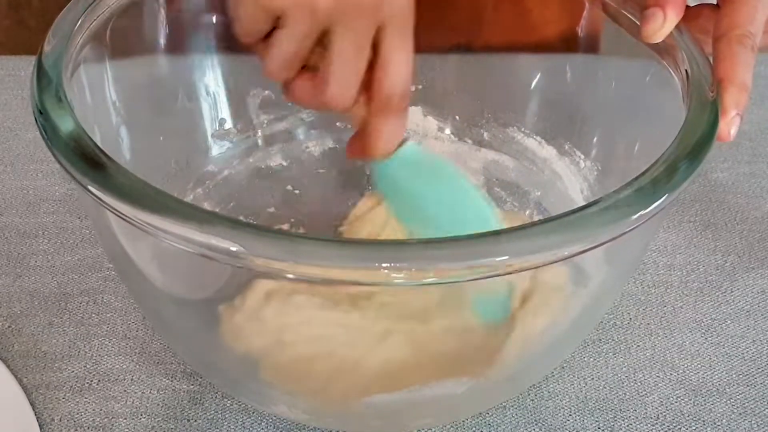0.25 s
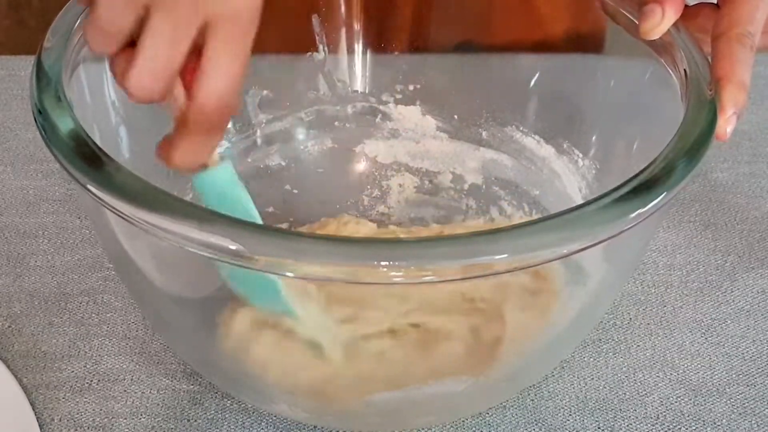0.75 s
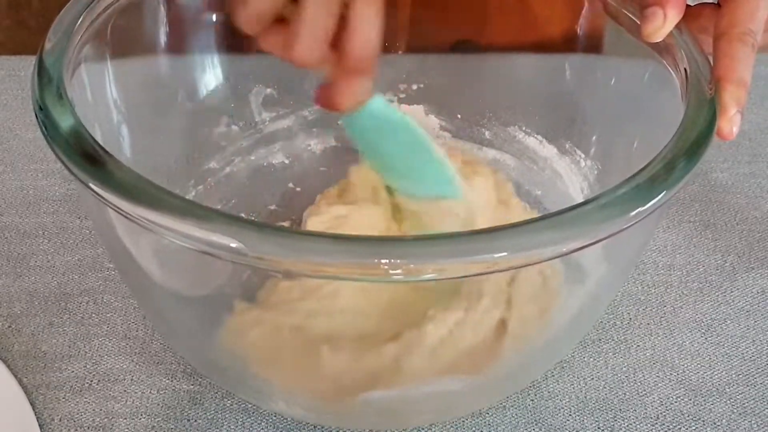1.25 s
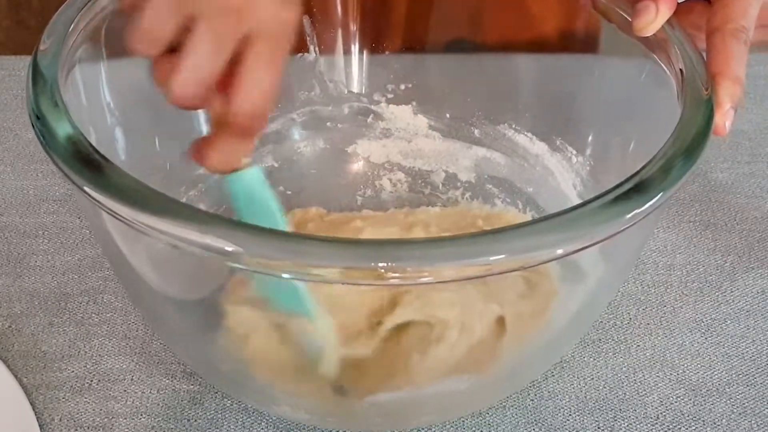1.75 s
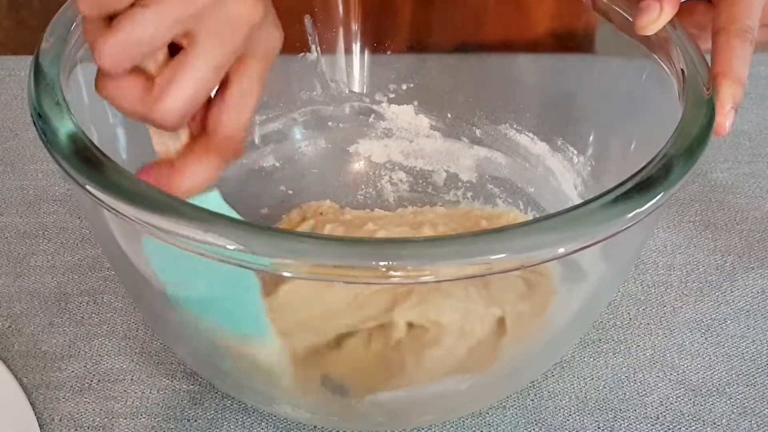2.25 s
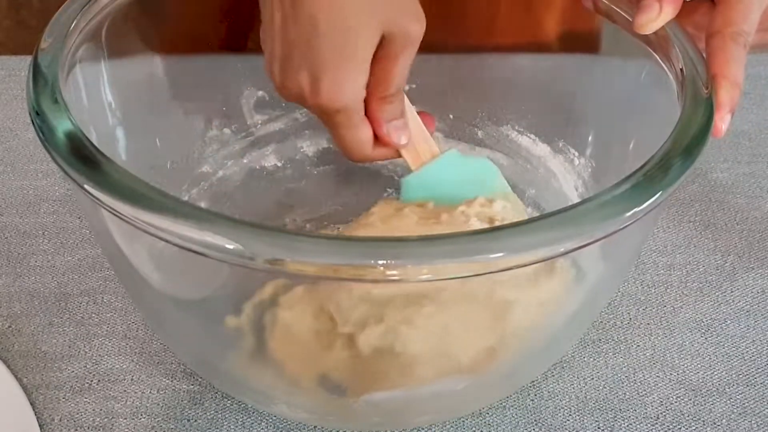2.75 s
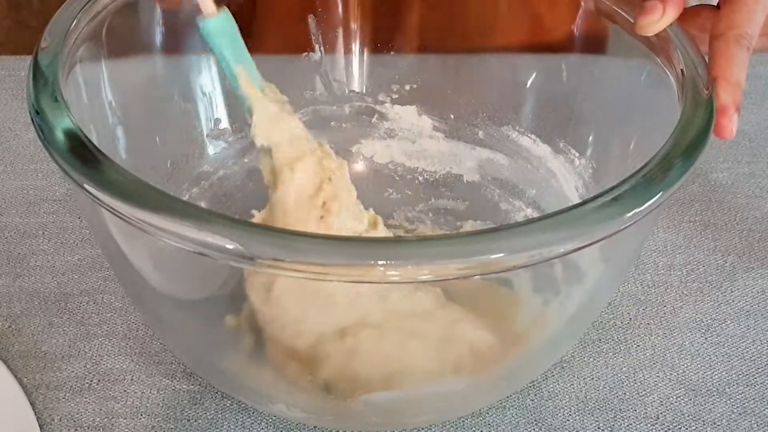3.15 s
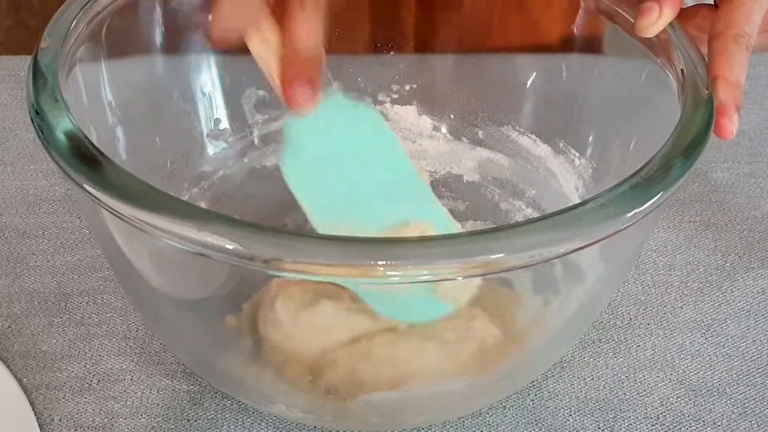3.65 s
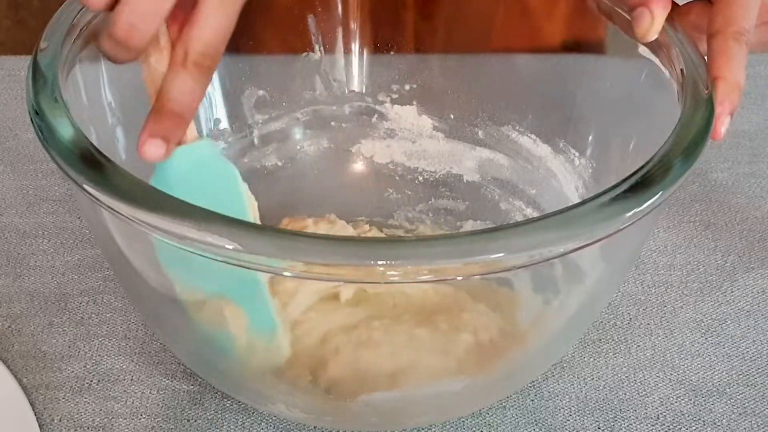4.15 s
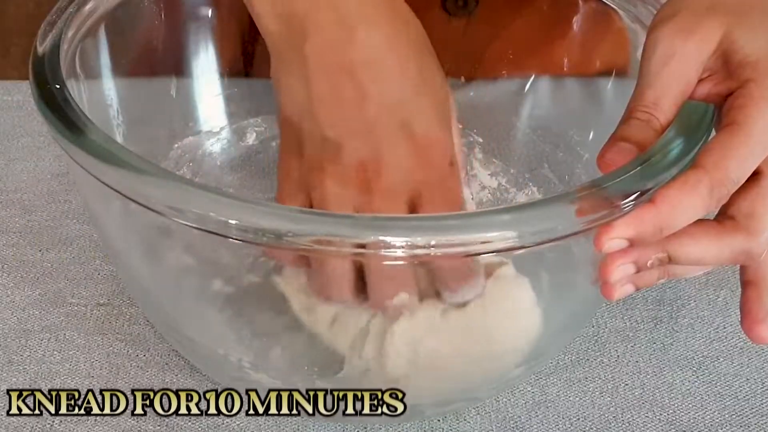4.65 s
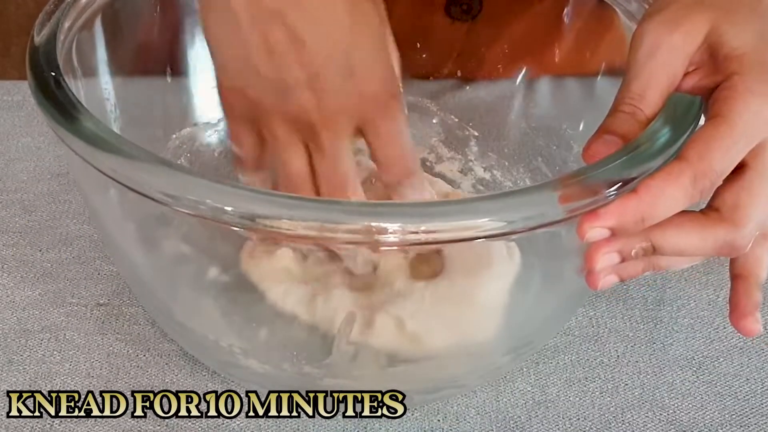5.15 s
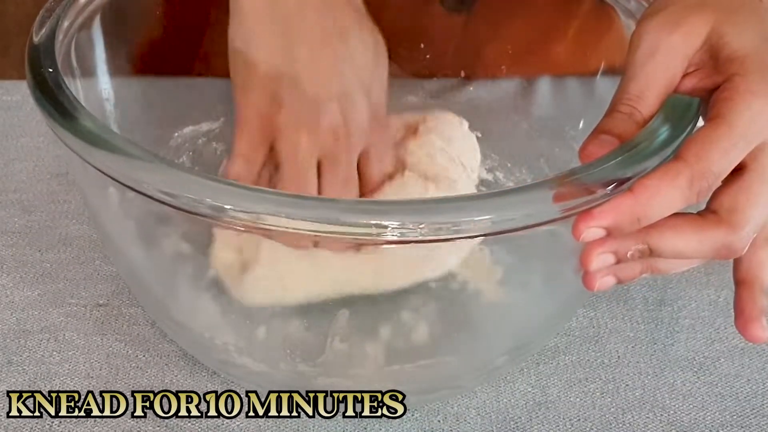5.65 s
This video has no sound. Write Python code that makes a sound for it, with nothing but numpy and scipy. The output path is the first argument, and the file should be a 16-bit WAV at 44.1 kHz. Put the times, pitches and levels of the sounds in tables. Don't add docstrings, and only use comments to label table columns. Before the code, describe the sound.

Sticky dough is folded in a glass bowl with deep table thumps and wet scrapes, then dragged briefly and softly kneaded by hand.

```python
import sys
import numpy as np
from scipy import signal
from scipy.io import wavfile
from scipy.ndimage import uniform_filter1d

SR = 44100
rng = np.random.default_rng(int(sys.argv[2]) if len(sys.argv) > 2 else 0)


def unload_audio(sound):
    columns = np.transpose(np.atleast_2d(sound))
    steps = np.round(np.clip(columns, -1, 1) * 32767)
    wavfile.write(sys.argv[1], SR, steps.astype(np.int16))


def volts_from_db(level):
    exponent = np.asarray(level, float) / 20
    return 10 ** exponent


N = 260190
CHANGE_S = 4.2154
TOP_HZ = 15900

# frequency in Hz, density in dB per Hz.
ROOM_SPECTRUM = [(21, -46), (36, -15.5), (86, 2), (139, -12.5), (299, -13.5), (406, -17), (511, -18.5),
                 (1830, -27), (1980, -30.5), (2620, -27), (3500, -30.5), (5000, -30), (6500, -33),
                 (8240, -33), (16000, -31)]
# frequency in Hz, likeness from 0 to 1.
STEREO_LIKENESS = [(50, 0.51), (130, 0.24), (300, 0.45), (700, 0.18), (2000, 0.052), (8000, 0.021)]

# start in seconds, level in dB, seconds until a hand damps it.
GLASS_TAPS = [
    (2.813, -37, 0.085),
    (2.918, -45, 0.0055),
]
# frequency in Hz, level in dB, 60 dB decay in seconds.
GLASS_MODES = [(402.4, -3.5, 0.45), (530, -9, 0.05), (439, -9, 0.28), (237, -12, 0.076), (1104, -11, 1),
               (1118, -21, 0.4), (702, -18.5, .05), (940, -13, 0.066), (2050, -18.5, 0.13),
               (1575, -21, .06), (2560, -13, 0.027)]
# peak in seconds, frequency in Hz, level in dB,
# rise in seconds, fall in seconds.
GLASS_SINGING = [(0.019, 924, -51, 0.041, 0.058), (1.568, 1554, -62, 0.045, .1),
                 (2.38, 4200, -49, .006, 0.074), (2.36, 5730, -49, .006, 0.087),
                 (2.36, 940, -53, 0.026, 0.082), (2.37, 1570, -63, 0.045, 0.09),
                 (2.41, 7200, -49, .08, .08), (2.401, 8000, -49, 0.093, 0.092), (2.422, 4000, -61, .06, .1),
                 (2.519, 4340, -56, .05, 0.14), (2.539, 2400, -56.5, .08, 0.14),
                 (2.54, 6300, -63, .04, 0.039), (2.74, 4000, -57, .05, 0.045),
                 (2.712, 5870, -50, 0.049, 0.081), (2.705, 3800, -52, 0.04, 0.08),
                 (2.75, 2500, -54, 0.07, 0.13), (2.76, 4600, -59, 0.067, .1),
                 (2.83, 3190, -55.5, 0.032, 0.04), (2.918, 4400, -58, 0.031, 0.069),
                 (4.275, 8200, -46.5, 0.053, .06), (4.27, 5000, -52, 0.045, .1),
                 (4.29, 6770, -50, 0.064, .06), (4.321, 7000, -50, .04, .03),
                 (4.295, 2950, -48, 0.048, 0.069), (4.33, 2980, -47, 0.035, 0.05),
                 (4.32, 5400, -54, 0.092, 0.07), (4.33, 4680, -52.5, .04, .06),
                 (4.33, 970, -54, .05, 0.085), (4.39, 490, -53.5, .05, 0.043), (4.42, 1000, -58, .04, .04),
                 (4.3, 1570, -55.5, 0.057, 0.09), (4.361, 1570, -61, 0.054, .08),
                 (4.352, 2820, -48.5, 0.037, 0.06), (4.839, 1570, -59, 0.086, .1),
                 (4.9, 1000, -67, 0.092, 0.074)]

# start in seconds, crack in dB, centre in Hz, fizz in dB re crack.
DOUGH_SNAPS = [(.1330, -29, 12000, -3), (.5975, -46, 8000, -8), (.6282, -34, 8000, -11),
               (.6475, -40, 9500, -6), (.9482, -43, 12000, -9), (.9635, -44, 12000, -4),
               (.9715, -38, 13000, -7), (1.2160, -46, 8000, -9), (1.2410, -42, 6600, -8),
               (1.5350, -39, 7500, -8), (1.7738, -42, 11500, -10), (1.9130, -38, 12500, -11),
               (2.2590, -39, 13500, -12), (2.2905, -33, 11000, -8), (2.2940, -36, 10500, -11),
               (2.2985, -34, 11000, -10), (2.3553, -23, 7000, -10), (2.3560, -27, 13000, -12),
               (2.4876, -25, 10000, -10), (2.5115, -33, 5500, -12), (2.5375, -35, 6000, -12),
               (2.7295, -33, 6000, -14), (2.6650, -38, 5000, -8), (2.7085, -34, 6000, -12),
               (2.7495, -34, 5000, -12), (2.8035, -31, 12000, -8), (2.9015, -33, 12000, -10),
               (4.6008, -44, 9000, -9)]
# start in seconds, plop in dB, centre in Hz, fizz in dB re plop.
WET_PLOPS = [(.133, -48, 950, 2), (.594, -55, 990, 5), (.628, -56, 980, 0), (.895, -52, 980, -5),
             (1.535, -36, 500, -1), (1.536, -48, 1710, -1), (1.588, -41, 1090, 0), (2.29, -50, 1570, 1),
             (2.355, -45.5, 940, 6.5), (2.487, -39, 1040, -6), (2.507, -47, 1030, 0),
             (2.507, -52, 1570, -4), (2.385, -50, 960, 2), (2.813, -39, 800, -6), (.952, -51, 1250, 2),
             (1.589, -46, 1800, -2), (1.605, -50, 1000, -3), (1.86, -52, 1310, 1), (1.775, -54, 1200, -3),
             (3.734, -51, 950, 5.5), (4.592, -57, 664, -13)]
# start in seconds, knock in dB, centre in Hz,
# rattle in dB re knock.
FOOT_KNOCKS = [(.27, -54, 300, -3), (.30, -57, 430, -14), (.32, -48, 430, 0), (.43, -57, 450, -3),
               (.593, -45, 440, -4), (.627, -44, 400, -8), (.655, -52, 400, -2), (.895, -55, 297, -3),
               (.918, -52, 330, -4), (1.213, -44, 435, -12), (1.225, -49, 247, -6), (1.262, -46, 360, -5),
               (1.30, -52, 300, -2), (1.533, -44, 464, -3), (1.555, -48, 240, -4), (1.56, -52, 508, -4),
               (1.59, -50, 420, -2), (1.838, -48, 600, -6), (1.845, -43, 244, 0), (1.865, -44, 290, -1),
               (1.89, -47, 380, -2), (1.93, -49, 330, -2), (2.487, -51, 450, -4), (2.592, -51, 400, -3),
               (2.655, -52, 300, -2), (2.746, -50, 380, -3), (2.815, -45, 146, -9), (2.828, -45, 450, -2),
               (2.918, -48, 400, -10), (4.192, -42, 187, -3), (4.228, -42, 243, 0), (4.240, -37, 227, -4),
               (4.31, -47, 480, -2), (4.355, -47, 500, -2), (4.594, -50.5, 350, 0), (5.02, -58, 500, -2),
               (5.2, -54, 300, -6), (5.23, -54, 320, -6)]
# start in seconds, thud in dB, centre in Hz,
# rumble in dB re thud.
BOWL_WOBBLES = [(.29, -46, 90, -3), (.6, -55, 96, -5), (.9, -46, 95.5, 2), (1.225, -40.5, 89.5, 5),
                (1.545, -32.5, 95, -9), (1.55, -44, 212, -1), (1.6, -39, 93, -1), (1.812, -44, 91, 3),
                (1.85, -35.5, 95.5, 9), (1.848, -41, 252, 1.5), (1.9, -40, 134, -1), (4.22, -46, 199, 0),
                (2.26, -52, 58, -2), (5.1, -53.5, 65, 6.5), (5.3, -50, 66.6, 1.5)]

# peak in seconds, hiss in dB, rise in seconds,
# fall in seconds, digging in dB; rise and fall span 20 dB.
STIRRING_STROKES = [(0.0, -50, .011, 0.37, -11), (.134, -48.5, 0.006, 0.13, 6.5),
                    (.323, -57, 0.056, 0.5, -6), (.635, -49.5, 0.034, 0.051, -11),
                    (.65, -47.5, 0.012, 0.17, -11.5), (.913, -60.5, 0.13, 2.6, -10),
                    (.966, -49.5, 0.026, 0.2, -13), (1.286, -50, 0.09, 0.13, -1.5), (1.3, -79, 3.1, 4.1, 4),
                    (1.536, -49, 0.0035, 0.13, -19), (1.57, -49, 0.073, 0.21, -5),
                    (1.75, -62.5, 0.15, 0.69, -2), (1.912, -53, 0.085, 0.19, -10)]
SCRAPING_STROKES = [(2.278, -64, 0.17, 0.035, -51), (2.289, -47.5, .003, 1, -17),
                    (2.356, -46, 0.047, 0.28, 6), (2.41, -45.5, 0.15, 0.33, 11.5),
                    (2.5, -49.5, .02, 0.7, 14), (2.715, -42.5, 0.082, 0.19, 4.5),
                    (2.762, -46.5, 0.12, 0.043, -4), (2.84, -49, 0.045, 0.19, -8.5),
                    (2.903, -41, 0.003, 0.055, -8), (3.066, -51, 0.092, 0.18, -3),
                    (3.493, -66, 0.51, 0.16, -20), (3.649, -65, .2, 0.082, -17),
                    (3.779, -57.5, 0.094, 0.19, -14)]
KNEADING_STROKES = [
    (4.546, -57.5, 0.12, 0.085, -4),
    (4.61, -51.5, 0.045, 0.087, 0.5),
    (4.736, -61, 0.34, .2, -4),
    (4.812, -44.5, 0.086, 0.1, 0.5),
    (4.89, -45.5, 0.13, 0.18, 3.5),
    (5.03, -53.5, .15, 0.074, 5),
    (5.19, -55.5, 0.99, 0.14, -1.5),
    (5.63, -57, 0.48, 0.1, -2.5),
    (5.718, -51.5, 0.066, 0.25, -1),
    (5.899, -58, 0.25, 0.14, 0),
]
# time in seconds, hiss in dB, digging in dB.
DRAG_MOTION = [
    (4.215, -49.5, -6),
    (4.235, -47.5, -4),
    (4.271, -47, -0.5),
    (4.327, -42.5, 5.5),
    (4.388, -48, 7.5),
    (4.465, -58.5, -3),
    (4.5, -74, -3),
]
# peak in seconds, wall in dB, rise in seconds,
# fall in seconds, cavity in dB re wall.
BLADE_SMEARS = [(.014, -70.5, 0.029, 0.12, 11.5), (.14, -75.5, 0.0087, 0.18, 10.5),
                (0.622, -68, 0.046, 0.12, 0), (.95, -68, 0.056, 0.3, 0.5), (1.272, -63, 0.061, 0.12, 0),
                (1.536, -54.5, 0.006, 0.11, 1.5), (1.59, -56, .03, 0.11, -1.5), (1.74, -65, .05, 0.11, -14),
                (2.36, -53, 0.066, 0.17, -3.5), (2.5, -56, 0.022, 0.22, -3), (2.6, -61, 0.11, 0.13, -6),
                (2.679, -63, 0.054, 0.17, -6), (2.76, -59, 0.12, 0.12, -12), (3.74, -74, 0.015, 0.063, 11)]
HAND_SMEARS = [
    (4.83, -61.5, 0.064, 0.25, 2.8),
    (5.15, -74.5, 1, 0.32, 4.5),
    (5.72, -72.5, 0.056, 0.25, 7.6),
]

# centre in Hz, width in Hz, level in dB.
FULL_BOWL = [
    [(7800, 2900, 1), (11460, 1200, 2.5), (15200, 3700, 1)],
    [(3800, 1750, 5), (5900, 1500, 5.5)],
    [(2090, 1000, 16), (2920, 800, 7), (3300, 770, 4)],
    [(989, 75, 5), (1566, 160, 1)],
]
# centre in Hz, width in Hz, level in dB.
DRAGGED_BOWL = [
    [(7400, 1900, 1.3), (11400, 5000, 1), (15300, 3500, 0)],
    [(3550, 1700, 3.4), (5240, 3700, 2.2)],
    [(2950, 360, 3.5), (2730, 1500, -2.5)],
    [(476, 51, 5.5), (1020, 58, 1.5), (1570, 540, -4.5)],
]
# centre in Hz, width in Hz, level in dB.
KNEADED_BOWL = [
    [(7630, 1800, 0.86), (12050, 2500, -0.34), (15500, 1400, -1.7)],
    [(3930, 2100, 0), (6440, 3700, 0)],
    [(2260, 2400, 11), (3330, 740, 2)],
    [(596, 250, -1.3), (1000, 150, 2), (1560, 340, -1)],
]
# low edge in Hz, high edge in Hz.
PART_RANGES = [(6270, 15540), (2600, 9400), (1410, 3800), (280, 2000)]
# level in dB, dB per dB of digging,
# dB per dB of hiss.
FULL_BALANCE = [
    (-5, 0.84, -0.18),
    (-17, 0.36, -0.72),
    (-21.5, 0.1, -0.5),
]
# level in dB, dB per dB of digging, dB per dB of hiss.
DRAGGED_BALANCE = [
    (-6, 0.5, 0.24),
    (-14.5, 1.25, 0.04),
    (-8, 0.91, 0.035),
]
# level in dB, dB per dB of digging, dB per dB of hiss.
KNEADED_BALANCE = [
    (-6.5, 1.23, -0.17),
    (-17, 0.44, -0.45),
    (-16, 0.33, -0.45),
]

# peak in seconds, creak in dB, rise in seconds, fall in seconds,
# rumble in dB re creak.
TABLE_PUSHES = [(0.0, -47, .01, 0.31, -3), (.3, -48, 0.067, 0.25, 1), (.64, -46.5, 0.092, 0.15, 1),
                (.95, -53.5, 0.13, 0.58, -0.5), (1.23, -42, 0.025, 0.19, 6), (1.54, -40, 0.015, 0.17, 8),
                (1.87, -41.5, 0.029, 0.13, 2), (2.4, -52.5, 0.21, 1, 0.5), (2.82, -42.5, 0.05, 0.21, -5.5),
                (3.73, -45, 0.0086, 0.13, -10), (4.23, -47.5, 0.044, 0.43, -3.5),
                (4.85, -56, 0.086, 0.78, 2.5), (5.1, -53.5, .2, 0.48, -10), (5.46, -64, 0.45, 0.72, 4)]
RESTING_HANDS = [
    (0.0, -60.5, 50., 50.6, 4),
]
# start in seconds, level in dB,
# panel in dB re level.
DOUGH_DROPS = [(.2848, -15.5, -5.6), (.5967, -22.6, -11), (.614, -40, 12.5), (.8976, -25.9, 4),
               (1.2181, -11.3, -.7), (1.5366, -8, 2.1), (1.8257, -19.4, -40), (1.8435, -28.4, -40),
               (1.8728, -21.5, -40), (2.917, -40, 10), (4.1947, -19.1, 5), (4.8505, -50, 16)]
# start in seconds, level in dB, panel in dB re level.
SIDE_SHOVES = [(1.8435, -8.4, 3.7), (1.8728, -19, -40), (2.3377, -28.6, -1.4), (2.8049, -22.4, -4.3),
               (4.2273, -21.2, -40), (4.8045, -26.2, -20), (5.4325, -23.5, -12)]
# start in seconds, level in dB.
HEEL_BUMPS = [(.2618, -13.2), (.2848, -10.8), (.5689, -13.9), (.5967, -7.9), (.614, -20.9), (.8692, -18.9),
              (.8976, -7.6), (1.187, -24), (1.2181, -14.2), (1.497, -21), (1.5366, -9.4), (1.809, -13),
              (1.8257, -17), (1.8435, 3.7), (2.4905, -17.9), (4.2273, -9), (4.5914, -18.7), (4.7189, -21.8),
              (4.8505, -21.2), (5.4325, -22.9)]
# frequency in Hz, 60 dB decay in seconds, polarity.
TABLE_MODES = [(45.7, .452, 1), (52.75, .134, -1), (118, .0258, -1), (132.74, .374, -1)]
TABLE_MODE_PANS = [-9.5, -5, -2.5, -8]
# frequency in Hz, level in dB, 60 dB decay in seconds.
UPPER_TABLE_MODES = [(80.6, 12, 0.53), (102, -2, 0.4), (163, -16, 0.084), (226, 7.5, 0.45), (301, 7, 0.49),
                     (360, -25, 0.21), (417, -14, 0.071), (510, 12, 0.099)]


def rms_one(x):
    return x / np.sqrt(np.mean(x ** 2) + 1e-20)


def in_time(rows):
    s, *columns = np.transpose(rows)
    return [np.interp(np.arange(N) / SR, s, c) for c in columns]


def at_hz(points, hz):
    table_hz, values = np.transpose(points)
    return np.interp(np.log(hz), np.log(table_hz), values)


def band(x, low_hz, high_hz):
    edges = [low_hz, min(high_hz, .45 * SR)]
    return signal.sosfilt(signal.butter(2, edges, "band", fs=SR, output="sos"), x)


def drift(rate_hz):
    r = np.exp(-80 * np.pi * rate_hz / SR)
    chance = rng.standard_normal(N // 40 + 2002)
    slow = signal.lfilter([1], [1, -2 * r, r * r], chance)[2000:]
    return np.interp(np.arange(N) / 40, np.arange(len(slow)), rms_one(slow))


def grain(shape, grain_db):
    return volts_from_db(grain_db * np.minimum(rng.exponential(1, shape), 4))


def ring(clicks, hz, t60):
    r = volts_from_db(-60 / (t60 * SR))
    w = 2 * np.pi * hz / SR
    return signal.lfilter([0, np.sin(w)], [1, -2 * r * np.cos(w), r * r], clicks + 1e-18)


def resonances(x, peaks, patchy_db=0):
    out = 0
    for k, (hz, width, db) in enumerate(peaks):
        r = np.exp(-np.pi * width / SR)
        a = [1, -2 * r * np.cos(2 * np.pi * hz / SR), r * r]
        gain = volts_from_db(db + patchy_db * drift(20.0))
        out = out + (-1) ** k * gain * signal.lfilter([1 - r * r, 0, r * r - 1], a, x)
    return rms_one(out)


def spread_out(mid, side, share=1):
    return mid + share * side * [[1], [-1]]


def alike_pair(mid, side, alike):
    return spread_out(np.sqrt(1 + alike) * mid, np.sqrt(1 - alike) * side)


def likeness(low_hz, high_hz):
    return np.clip(at_hz(STEREO_LIKENESS, np.sqrt(low_hz * high_hz)), -1, 1)


def panned(x, pan_db):
    pair = volts_from_db([[pan_db / 2], [-pan_db / 2]])
    return x * pair / pair.mean()


def coloured(spectrum, patchy_db, grain_db):
    white = rng.standard_normal((2, 2, N)) * grain(N, grain_db)
    first, last = spectrum[0][0], spectrum[-1][0]
    edges = np.geomspace(first, last, 1 + round(2 * np.log2(last / first)))
    out = 0
    for k, (low, high) in enumerate(zip(edges, edges[1:])):
        mid, side = band(white[k % 2], low, high)
        gain = volts_from_db(at_hz(spectrum, np.sqrt(low * high)) + patchy_db * drift(23.0))
        out = out + gain * alike_pair(mid, side, likeness(low, high))
    return out / np.sqrt(np.mean(out.mean(axis=0) ** 2))


def strokes(rows):
    s, db, rise, fall, manner_db = np.transpose(rows)[:, :, None]
    t = np.arange(0, N + 32, 32) / SR
    away = np.maximum((s - t) / np.maximum(rise, .001), (t - s) / np.maximum(fall, .01))
    power = volts_from_db(2 * db - 40 * away) + 1e-30
    total = power.sum(axis=0)
    manner = (power * manner_db).sum(axis=0) / total
    return in_time(np.transpose([t, 10 * np.log10(total), manner]))


def kitchen_air():
    return volts_from_db(-56.5) * coloured(ROOM_SPECTRUM, patchy_db=0.37, grain_db=-1.2)


def scene_change():
    t = np.arange(N) / SR - CHANGE_S
    return volts_from_db(-23.5) * (t >= 0) * np.exp(-np.maximum(t, 0) / .0013)


def glass():
    out, t = np.zeros(N), np.arange(SR // 3) / SR
    for s, db, free_s in GLASS_TAPS:
        click = volts_from_db(db) * (np.arange(len(t)) < 8) / 8
        damping = volts_from_db(-900 * np.maximum(t - free_s, 0))
        tone = 0
        for k, (hz, mode_db, t60) in enumerate(GLASS_MODES):
            tone = tone + (-1) ** k * volts_from_db(mode_db) * ring(click, hz, t60)
        out[round(s * SR):][:len(t)] += damping * tone
    return out


def singing():
    width_hz, side_share = 53, 0.61
    out, t = np.zeros((2, N + SR)), np.arange(-SR // 4, SR // 4) / SR
    noises = rng.standard_normal((len(GLASS_SINGING), 2, len(t)))
    for (s, hz, db, rise, fall), noise in zip(GLASS_SINGING, noises):
        mid, side = signal.lfilter(*signal.iirpeak(hz, hz / width_hz, fs=SR), noise)
        away = np.maximum(-t / max(rise, .002), t / max(fall, .01))
        swell = volts_from_db(db - 20 * away) / mid.std()
        at = round(s * SR) + SR // 4
        out[:, at:at + len(t)] += swell * spread_out(mid, side, side_share)
    return out[:, SR // 2:][:, :N]


def snaps(rows, crack_s, spread, t60, pan_db):
    out, t = np.zeros((2, N)), np.arange(SR // 4) / SR
    for (s, db, hz, fizz_db), noise in zip(rows, rng.standard_normal((len(rows), 2, len(t)))):
        edges = hz / spread, min(hz * spread, TOP_HZ)
        crack = band(band(noise[0] * np.exp(-t / crack_s), *edges), *edges)
        fizz = band(noise + 0.29 * noise[::-1], hz / 1.12, hz * 1.126)
        fizz = rms_one(fizz) * volts_from_db(-60 * t / max(t60, .003) + fizz_db)
        at = round(s * SR)
        out[:, at:at + len(t)] += panned(volts_from_db(db) * (crack / np.abs(crack).max() + fizz), pan_db)
    return out


def friction(motion, smears, span, parts, bowl, grain_db, patchy_db, pan_db):
    hiss_db, dig_db = motion
    louder_db = np.maximum(hiss_db, -80) + 50
    part_dbs = [0] + [db + by_dig * dig_db + by_hiss * louder_db for db, by_dig, by_hiss in parts]
    wall_db, cavity_db = strokes(smears)
    smeared = [0, 0, volts_from_db(wall_db), volts_from_db(wall_db + cavity_db)]
    t = np.arange(N) / SR
    touching = (t >= span[0]) & (t < span[1])
    out, catch = 0, grain(N, grain_db)
    for part_db, extra, peaks, (low, high) in zip(part_dbs, smeared, bowl, PART_RANGES):
        grains = band(catch * rng.standard_normal((2, N)), low, high)
        mid, side = resonances(grains, peaks, patchy_db)
        alike = likeness(low, high)
        pair = alike_pair(mid, side, alike) / np.sqrt(1 + alike)
        level = np.hypot(volts_from_db(hiss_db + part_db), extra)
        out = out + level * volts_from_db(0.3 * patchy_db * drift(56)) * pair
    return touching * panned(out, pan_db)


def pressure():
    creak_db, rumble_db = strokes(TABLE_PUSHES + RESTING_HANDS)
    modes = [(47.5, 11.7, -2.5), (84.7, 31.2, -4.5), (131.0, 37.6, -7.0)]   # Hz, width Hz, dB
    mid, side = resonances(rng.standard_normal((2, N)), modes)
    shake_level = volts_from_db(np.minimum(creak_db + rumble_db, -49))
    shake = spread_out(mid, side, 0.74) * panned(shake_level, -10.5)
    creak = coloured([(170, -7.0), (350, -1.0), (680, -18.5)], patchy_db=-0.5, grain_db=3.0)
    return shake + panned(volts_from_db(creak_db - 6.0) * creak, -4)


def contacts():
    none = -99
    drops = [(s, db, db - 16, none, db + panel_db) for s, db, panel_db in DOUGH_DROPS]
    shoves = [(s, db - 12, db, none, db + panel_db) for s, db, panel_db in SIDE_SHOVES]
    bumps = [(s, db - 25, none, db, none) for s, db in HEEL_BUMPS]
    return np.array(drops + shoves + bumps)


def thumps():
    rows = contacts()
    at, out = np.round(rows[:, 0] * SR).astype(int), 0
    for k, (hz, t60, polarity) in enumerate(TABLE_MODES):
        clicks = np.bincount(at, polarity * volts_from_db(rows[:, 1 + k]), N)
        out = out + panned(ring(clicks, hz, t60), TABLE_MODE_PANS[k])
    soft = np.exp(-1 / (.01 * SR))
    out = uniform_filter1d(signal.lfilter([1 - soft], [1, -soft], out), size=111) * 1.13
    chance = rng.standard_normal((len(rows), len(UPPER_TABLE_MODES)))
    for (hz, db, t60), luck in zip(UPPER_TABLE_MODES, chance.T):
        clicks = np.bincount(at, volts_from_db(rows[:, 4] - 49.5 + db + 0.87 * luck), N)
        out += panned(ring(uniform_filter1d(clicks, size=51), hz, t60), -5.0)
    return out


def scene():
    air = panned(kitchen_air(), -2.1)
    ringing = panned(glass(), -6.0) + panned(singing(), -2.7)
    sticking = snaps(DOUGH_SNAPS, crack_s=.0003, spread=3.0, t60=.014, pan_db=1)
    sticking += snaps(WET_PLOPS, crack_s=0.00024, spread=4.2, t60=0.027, pan_db=1)
    sticking += snaps(FOOT_KNOCKS, crack_s=0.0067, spread=1.25, t60=0.052, pan_db=-2.5)
    rubbing = friction(strokes(STIRRING_STROKES + SCRAPING_STROKES), BLADE_SMEARS, (0, CHANGE_S),
                       FULL_BALANCE, FULL_BOWL, grain_db=4.0, patchy_db=1.5, pan_db=-0.9)
    rubbing += friction(in_time(DRAG_MOTION), HAND_SMEARS, (CHANGE_S, DRAG_MOTION[-1][0]),
                        DRAGGED_BALANCE, DRAGGED_BOWL, grain_db=-2.0, patchy_db=0.6, pan_db=-1.7)
    rubbing += friction(strokes(KNEADING_STROKES), HAND_SMEARS, (CHANGE_S, N / SR),
                        KNEADED_BALANCE, KNEADED_BOWL, grain_db=2.0, patchy_db=1.0, pan_db=-1.6)
    table = thumps() + pressure() + panned(scene_change(), -1.6)
    table += snaps(BOWL_WOBBLES, crack_s=0.0093, spread=1.33, t60=0.27, pan_db=-6.5)
    return air + ringing + sticking + rubbing + table


def roll_off(x):
    return signal.sosfilt(signal.butter(12, 16680, fs=SR, output="sos"), x)


def record(dry):
    low_cut = signal.sosfilt(signal.butter(8, 42.56, "high", fs=SR, output="sos"), dry)
    top_cut = signal.sosfilt(signal.cheby2(12, 60, TOP_HZ + 600, fs=SR, output="sos"), low_cut)
    dip_hz, width_hz, share = 3430, 320, 0.15
    dip = signal.lfilter(*signal.iirpeak(dip_hz, dip_hz / width_hz, fs=SR), top_cut)
    return roll_off(top_cut - share * dip)


dry = scene()
out = record(dry)
unload_audio(out)
```